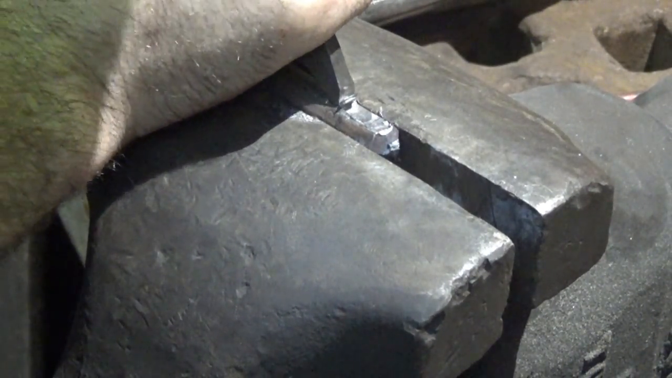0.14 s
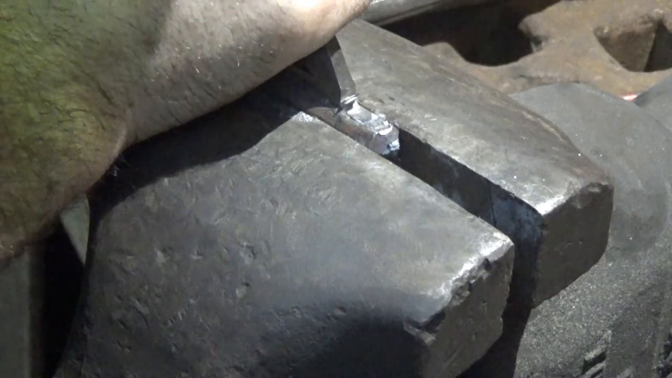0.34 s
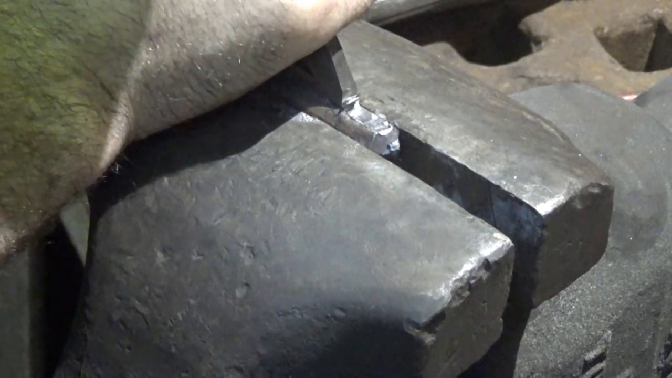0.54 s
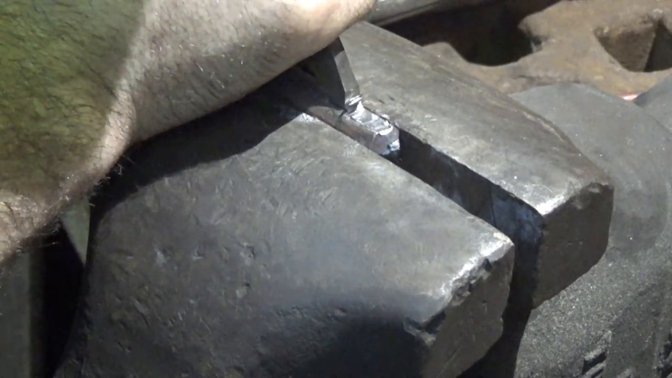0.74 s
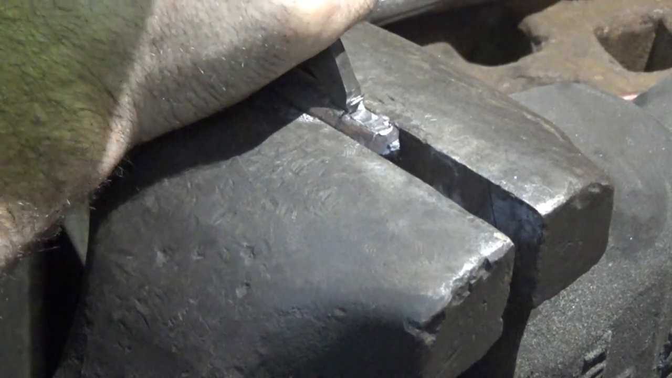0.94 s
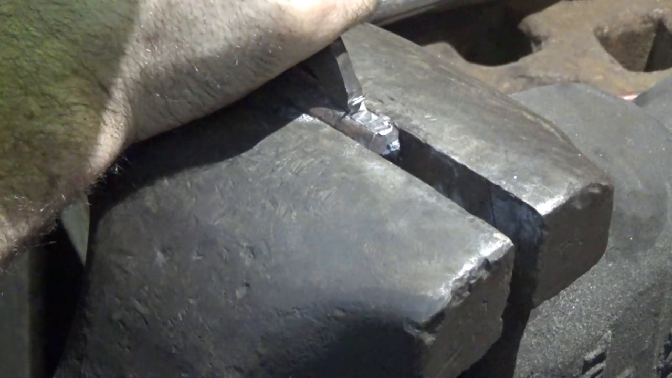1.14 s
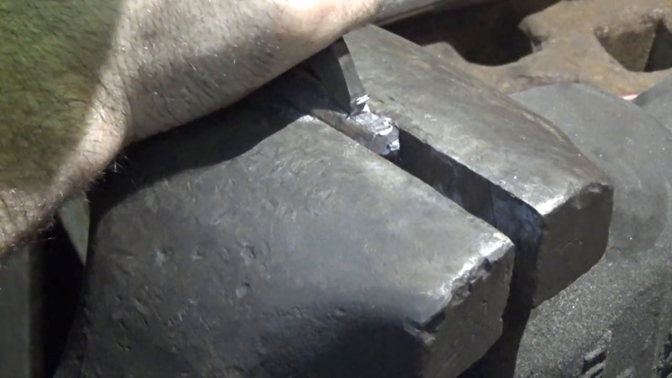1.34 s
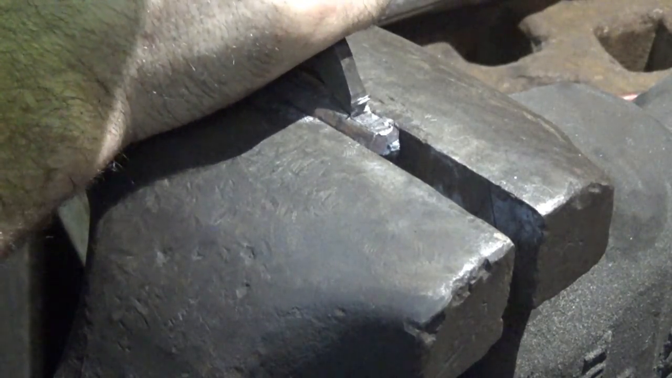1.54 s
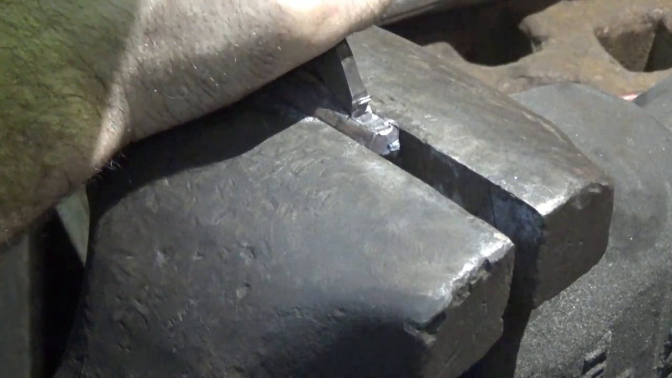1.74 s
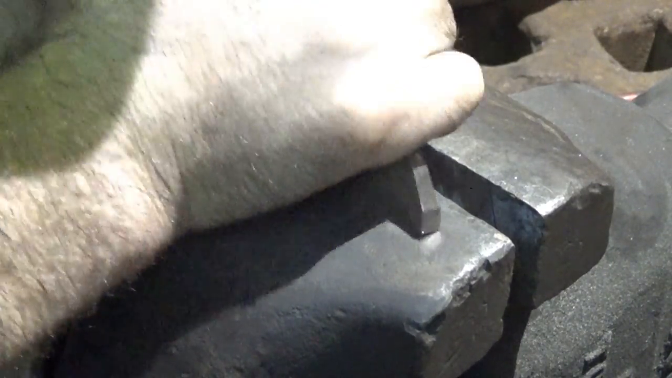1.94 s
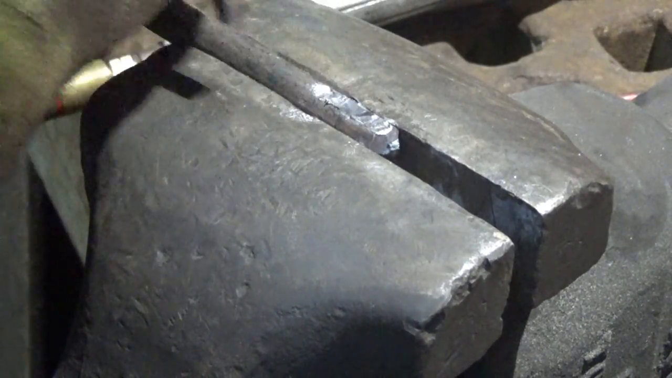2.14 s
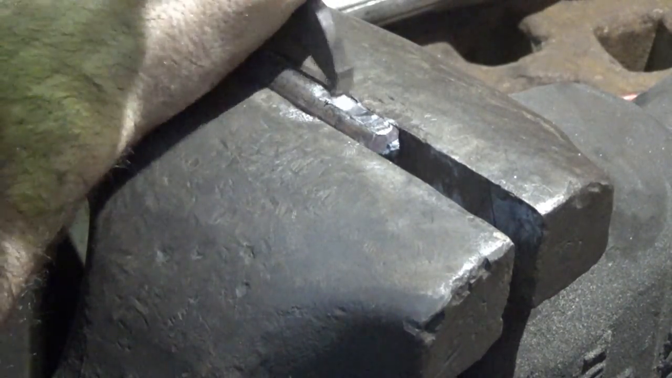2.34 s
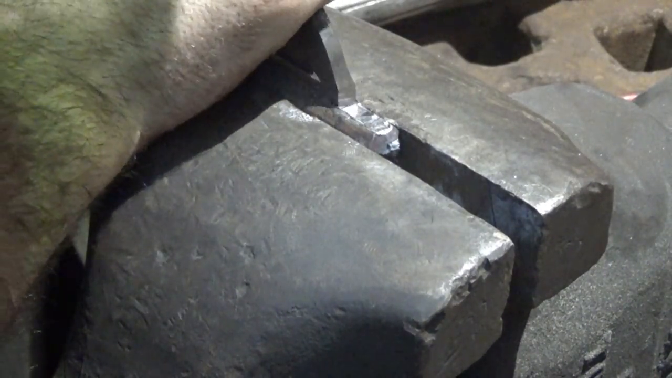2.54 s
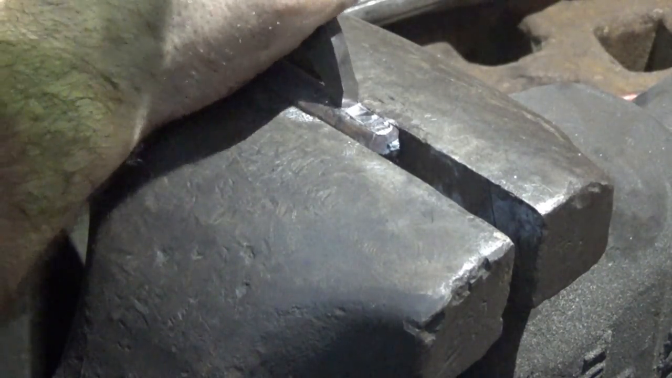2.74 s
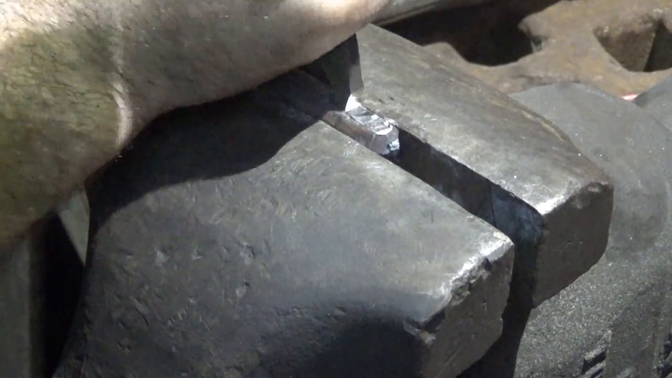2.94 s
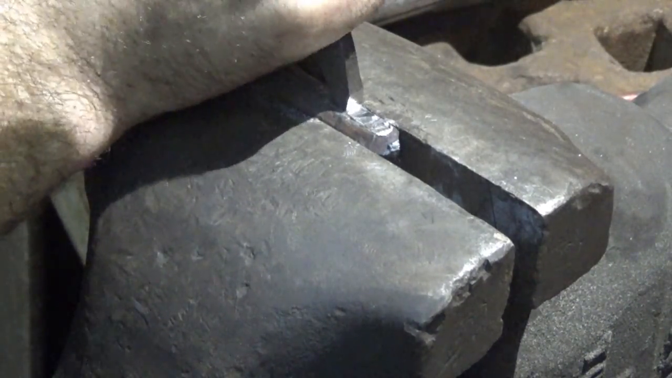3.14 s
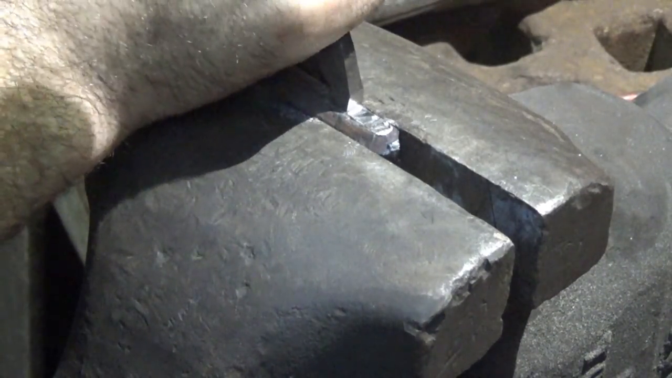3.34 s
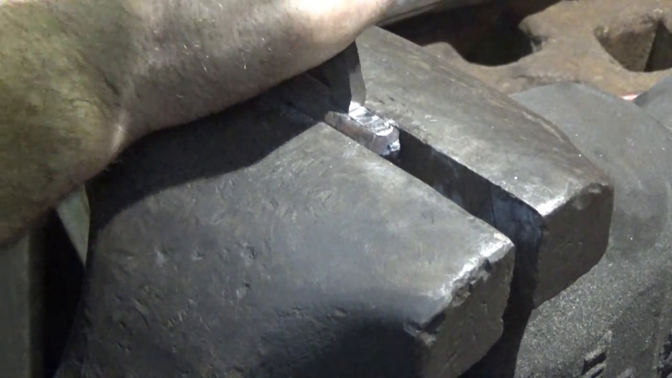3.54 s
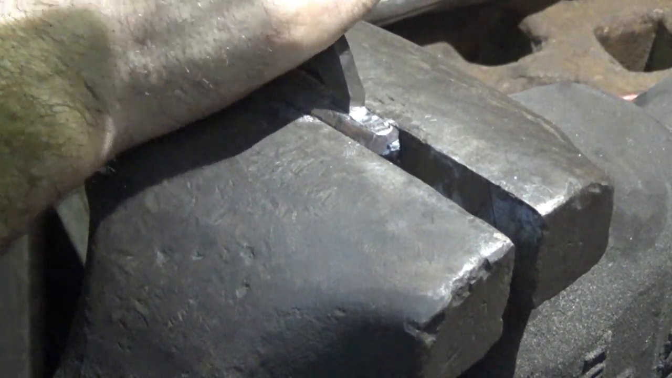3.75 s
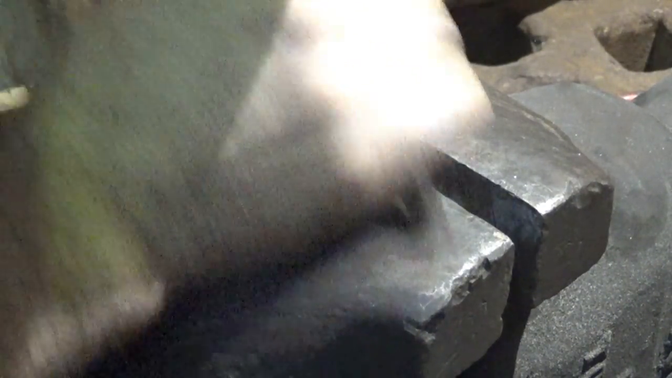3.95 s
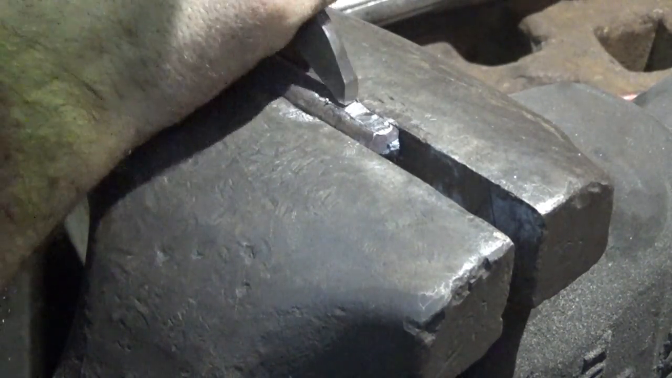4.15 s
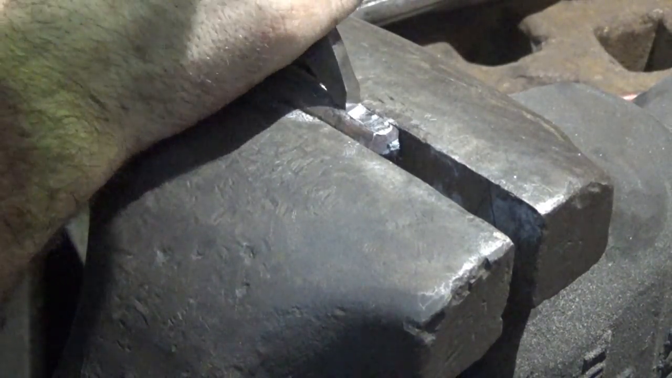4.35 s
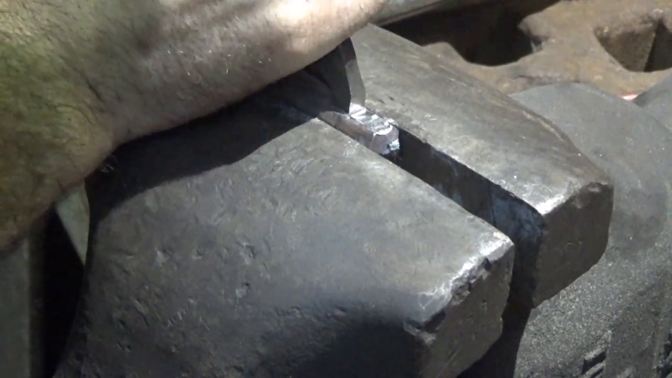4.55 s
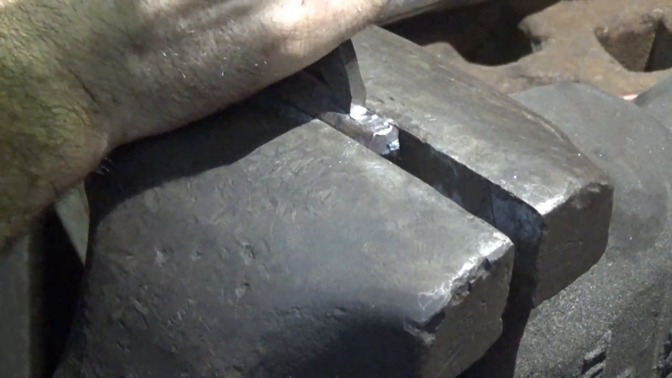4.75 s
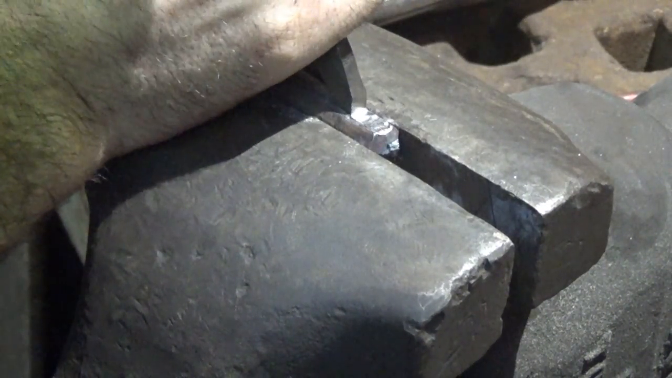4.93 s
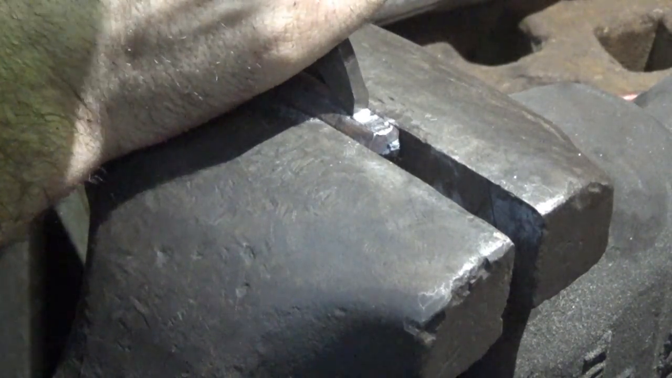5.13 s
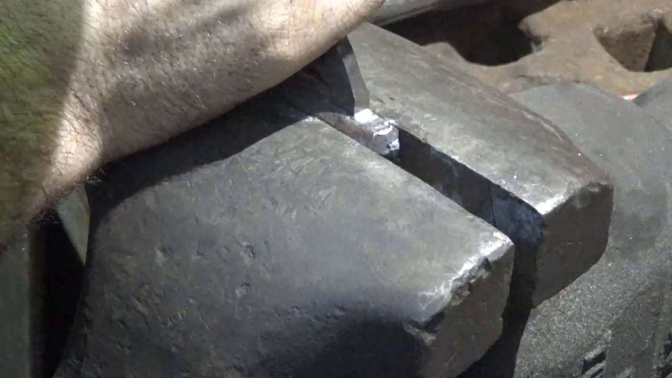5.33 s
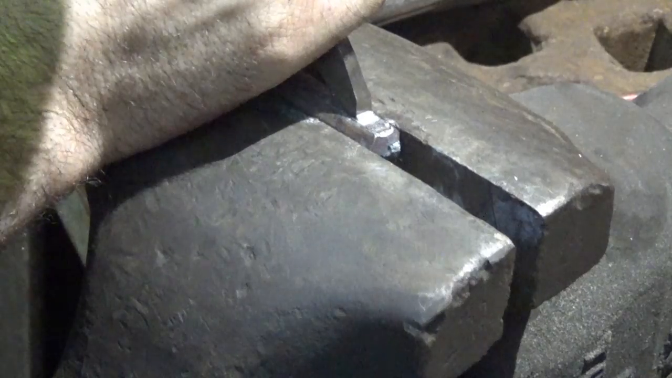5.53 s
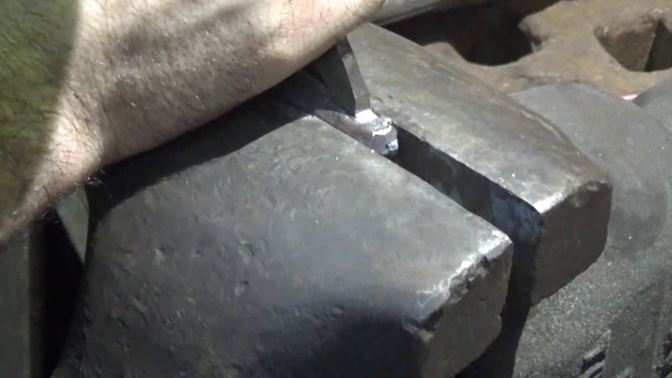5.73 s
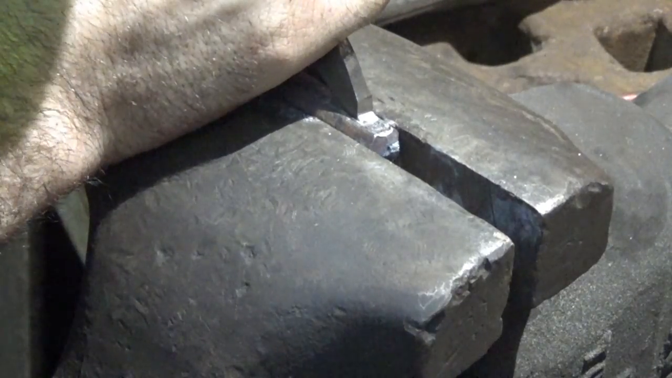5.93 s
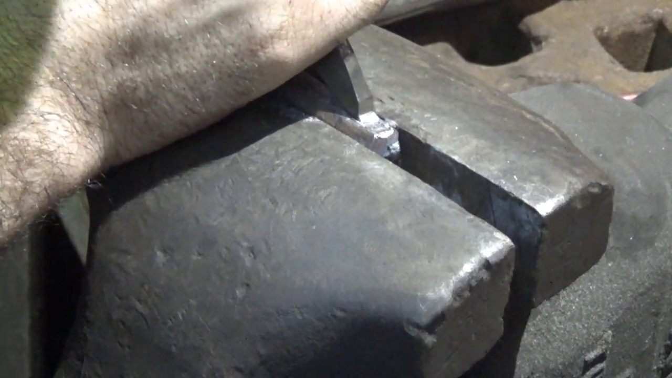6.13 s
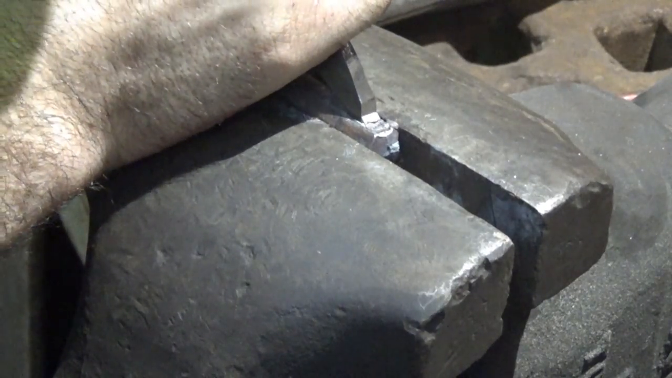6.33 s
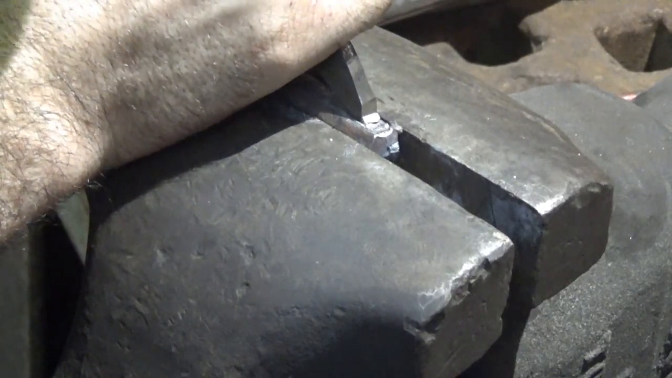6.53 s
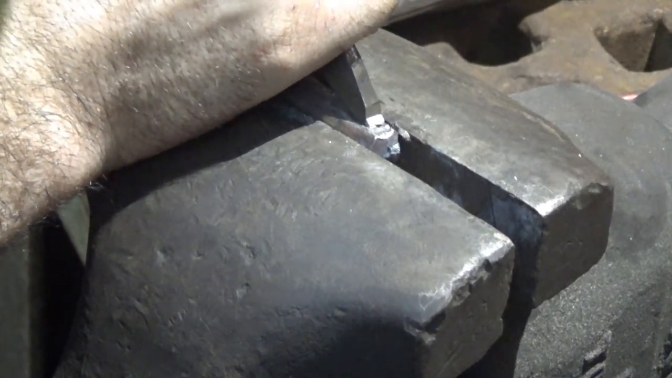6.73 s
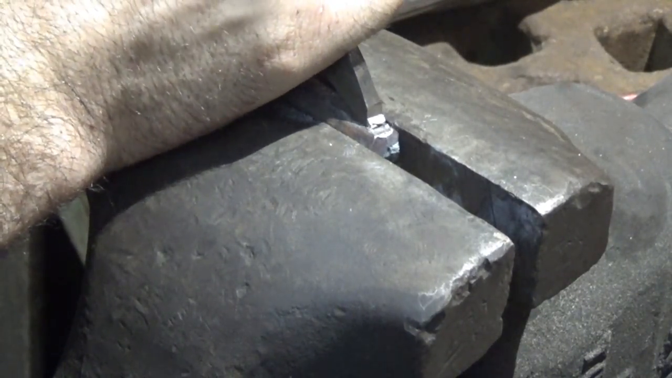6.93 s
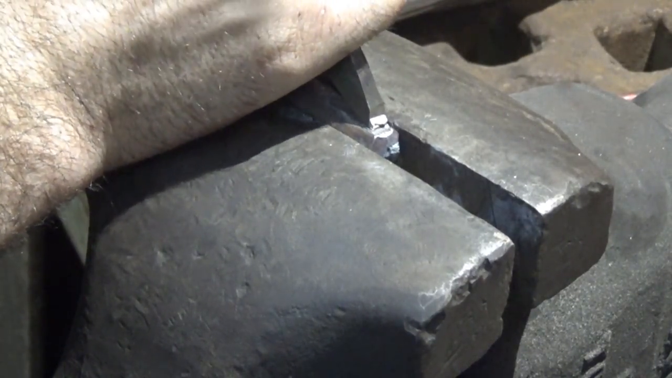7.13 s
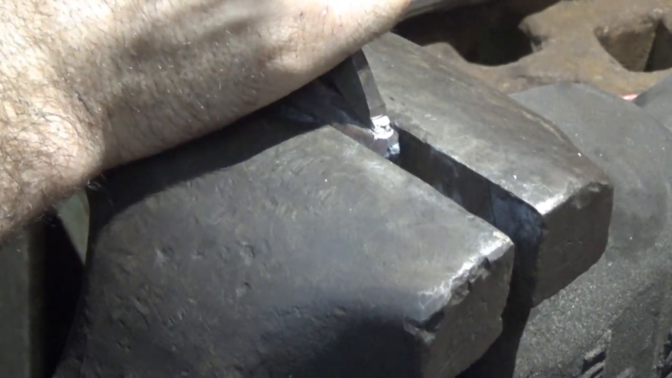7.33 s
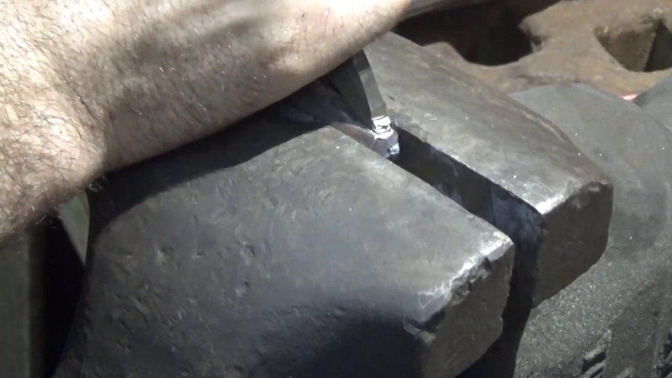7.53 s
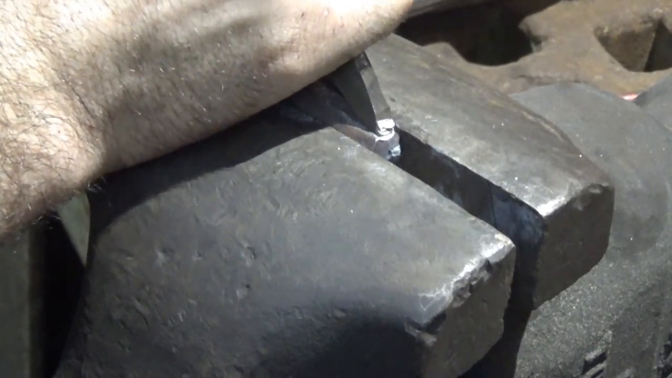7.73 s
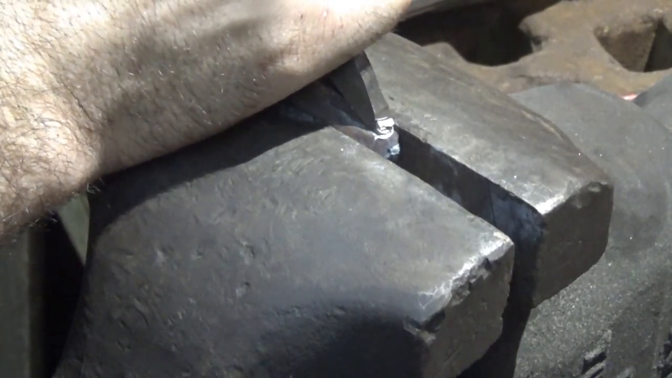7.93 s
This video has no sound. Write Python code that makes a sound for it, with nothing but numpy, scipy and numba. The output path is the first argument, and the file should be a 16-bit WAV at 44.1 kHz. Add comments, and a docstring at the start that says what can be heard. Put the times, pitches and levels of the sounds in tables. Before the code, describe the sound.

Close, loud and slightly flattened clanks of chisel on clamped steel, each with a bright crack, a wavering metallic ring and a short hollow room tail. The slow, slightly uneven hammering breaks off twice. In the gaps the chisel skids with tiny rough squeals and taps on metal, and a clack with a weak knock precedes each restart. Quiet air hiss and workshop hum lie underneath.

```python
"""A slow air hammer drives a chisel into a steel shaft clamped in a vise, about seven blows a second in three bursts.
Each blow is an impact: cracking noise, beating modes of vise and chisel, knocking echoes and a small hard room's tail.
Air hisses from the start over faint room noise and hum. After the first two bursts stick-slip squeals and light
ticks of steel follow; a clack over a weak blow leads into the second and third bursts. A limiter flattens the peaks.
"""
import sys
import numpy as np
from scipy import signal
from scipy.fft import rfft, irfft, next_fast_len
from scipy.io import wavfile
from scipy.ndimage import uniform_filter1d, minimum_filter1d
from numba import njit

SR = 44100
rng = np.random.default_rng(int(sys.argv[2]) if len(sys.argv) > 2 else 0)


def master_out(mix):
    """Clip the mix to full scale and print it as 16-bit PCM to the path in sys.argv[1]."""
    frames = np.transpose(np.atleast_2d(mix))
    ceiling = np.clip(frames, -1, 1)
    pcm = np.round(ceiling * 32767).astype(np.int16)
    wavfile.write(sys.argv[1], SR, pcm)


N = 351918

RING = 16384  # length of one blow's sound [samples]
AGE = np.arange(RING) / SR  # time since the blow [s]
# modes whose strength varies most from blow to blow: vise, then two of the chisel: frequency [Hz]
SWAY_HZ = (1395, 4486, 7943)


def undb(db):
    """Amplitude ratio: 20 dB is a factor of ten."""
    return 10 ** (np.asarray(db) / 20)


def over_hz(size, hz, values):
    """Logarithmic frequency scale: values joined by straight lines on it, at the bins of a transform."""
    bins_hz = np.arange(size // 2 + 1) * SR / size
    return np.interp(np.log(bins_hz + 1), np.log(hz), values)


def colour(x, points):
    """Minimum-phase filter: folding the cepstrum makes a (frequency [Hz], level [dB]) spectrum causal."""
    size = x.shape[-1]
    log_gain = np.log(undb(over_hz(size, *np.transpose(points))))
    cepstrum = irfft(log_gain, size)
    cepstrum[1:size // 2] *= 2
    cepstrum[size // 2 + 1:] = 0
    response = np.exp(rfft(cepstrum))
    return irfft(rfft(x) * response, size)


def fade(t60):
    """Exponential damping: the amplitude falls by 60 dB in t60 [s]."""
    return np.exp(-np.log(1000) * AGE / t60)


def add(out, s, sound):
    """Superposition: mix a sound in at time s [s], cut at both ends of the scene."""
    start = int(s * SR)
    first, last = max(start, 0), min(start + sound.shape[-1], N)
    out[..., first:last] += sound[..., first - start:last - start]


def wander(count, step_s):
    """Low-pass random motion: noise averaged twice over step_s, in rows with an overall spread of 1."""
    size = max(int(step_s * SR), 2)
    rows = rng.standard_normal((count, RING))
    for _ in range(2):
        rows = uniform_filter1d(rows, size, mode="wrap")
    return (rows / rows.std()).astype(np.float32)


def stereo(mid, other):
    """Decorrelated reflections: two close microphones share the mid and hear the side with opposite sign."""
    # side against mid, least in the bass: (frequency [Hz], level [dB])
    apart = [(60, -41), (130, -27), (300, -41), (600, -28), (950, -26), (1400, -18), (3200, -17),
             (5800, -25), (8000, -24), (15000, -25)]
    side = colour(other, apart)
    return np.array([mid + side, mid - side])


def crack(count, t60=0.051):
    """Broadband impact: steel on steel excites a decaying noise, one row for each blow."""
    # spectrum of the direct crack: (frequency [Hz], relative level [dB])
    spectrum = [(100, -28.5), (700, -25), (1500, -20), (2600, 3), (5000, -25.5), (8000, -0.5), (10500, -6),
                (15500, -2)]
    return colour(rng.standard_normal((count, RING)) * fade(t60), spectrum)


def ring(modes, sway_db, scatter_db, beat_s, change, build_s, direct_db, beat_rad=1.0, beat_db=3, direct_t60=0.046):
    """Modal superposition: struck modes beat against their reflections, partly anew on each blow (row)."""
    # damping of the clamped steel: (frequency [Hz], t60 [s])
    damping = [(300, .35), (1400, .29), (2000, .25), (4500, .18), (8000, .15), (12000, .15)]
    count, out = len(sway_db), 0
    beats, change = wander(count, beat_s), float(np.clip(change, 0, 1))

    def beating():
        common = beats[rng.integers(count)]
        fresh = beats[rng.permutation(count)]
        return (1 - change) ** .5 * common + change ** .5 * fresh

    for hz, db in modes:
        # modes within 2.5 % of SWAY_HZ take each blow's own level
        blow_db = sway_db @ (np.abs(hz / np.array(SWAY_HZ) - 1) < .025)
        strength = undb(db + blow_db + scatter_db * rng.standard_normal(count)).astype(np.float32)
        turn, swell = beating(), beating()
        phase = (2 * np.pi * (hz * AGE + rng.random())).astype(np.float32)
        tone = np.sin(phase + float(beat_rad) * turn)
        wave = tone * np.exp(float(np.log(undb(beat_db))) * swell)
        # a quick ring heard directly, then a longer one carried by the room
        direct = undb(direct_db) * fade(direct_t60)
        carried = fade(np.interp(hz, *np.transpose(damping)))
        out = out + strength[:, None] * wave * (direct + carried).astype(np.float32)
    return out * (1 - np.exp(-AGE / build_s))


def workshop(count, build_s=0.0091):
    """Diffuse reverberation: paths stay the same, a share of the field changes with each blow's contact."""
    # dense ring of steel and workshop:
    # (frequency [Hz], relative level [dB], t60 [s], share of power that changes from blow to blow [0 to 1])
    bands = [(40, -36.5, .5, 0.55), (113, -35.5, 0.4, 0.19), (198, -30, 0.46, .1), (320, -23, 0.49, 0.2),
             (583, -20, 0.26, 0.038), (1010, -1.5, 0.2, 0.083), (1510, -1, 0.18, 0.48),
             (3030, -0.5, 0.2, 0.3), (3400, -8, 0.2, 0.29), (6900, -11, 0.17, 0.93),
             (8600, -14, 0.23, 0.85), (10300, -14, 0.18, 0.25), (15500, -7.5, 0.16, 0.43)]
    hz, db, t60, change = np.transpose(bands)
    share = np.clip(over_hz(RING, hz, change), 0, 1)
    paths = rfft(rng.standard_normal(RING))
    contact = rfft(rng.standard_normal((count, RING)))
    field = np.sqrt(1 - share) * paths + np.sqrt(share) * contact
    field = field * undb(over_hz(RING, hz, db))
    # overlapping triangular bands, each with its own decay
    tails = sum(irfft(field * over_hz(RING, hz, band)) * fade(t) for band, t in zip(np.eye(len(hz)), t60))
    return tails * (1 - np.exp(-AGE / build_s))


def returns():
    """Early reflections: bench and corners narrow each echo to a hollow knock."""
    # echoes from bench and walls: (delay [s], frequency [Hz], Gaussian length [s], relative level [dB])
    echoes = [(0.024, 1132, .005, -16), (0.03, 940, .005, -19), (0.04, 1102, 0.0037, -15.5),
              (0.057, 570, .012, -38)]
    out = 0
    for s, hz, length, db in echoes:
        swell = np.exp(-((AGE - s) / length) ** 2)
        out = out + undb(db) * swell * np.sin(2 * np.pi * (hz * AGE + rng.random()))
    return out


def struck(sway_db, crack_db=-4, tail_db=0, vise_db=-2.0, chisel_db=-4):
    """Impact response: crack, ringing steel and room of every blow add up, one row each."""
    # modes of vise, shaft and bench: (frequency [Hz], relative level [dB])
    vise_modes = [(268, -48), (338, -38), (495, -35), (595, -35.5), (734, -32.5), (872, -28.5),
                  (931, -24.5), (1020, -29.5), (1057, -42), (1092, -24), (1149, -52), (1170, -26.5),
                  (1238, -40), (1386, -19.5), (1402, -24), (1671, -30), (1717, -27.5), (1816, -23.5),
                  (1897, -34), (2021, -28.5), (2174, -41), (2293, -29), (2438, -24.5), (2575, -21.5),
                  (2618, -24.5), (2765, -44), (2812, -23.5), (2943, -19), (3003, -33), (3326, -44)]
    # modes of chisel and hammer barrel: (frequency [Hz], relative level [dB])
    chisel_modes = [(3426, -24), (4390, -34.5), (4486, -29), (4790, -28), (5001, -23), (5154, -25.5),
                    (5647, -24.5), (6376, -20.5), (6750, -26.5), (7396, -19.5), (7520, -35.5),
                    (7943, -20.5), (8365, -21.5), (8478, -20), (8548, -29.5), (8669, -19.5), (9299, -26),
                    (9385, -21.5), (11038, -22), (12005, -22.5)]
    count = len(sway_db)
    vise = ring(vise_modes, sway_db, scatter_db=1.97, beat_s=0.027, change=0.08, build_s=0.01, direct_db=7.5)
    chisel = ring(chisel_modes, sway_db, scatter_db=3.5, beat_s=0.01, change=0.19, build_s=0.0034,
                  direct_db=-15)
    steel = undb(vise_db) * vise + undb(chisel_db) * chisel
    return undb(crack_db) * crack(count) + undb(tail_db) * workshop(count) + steel


def hammer(scatter_db=0.5):
    """Force transfer at a contact: piston hits chisel; held loosely, it sounds weak, thin and bright."""
    # blows: (time [s], force [dB], bite: -1 rings the highest mode of SWAY_HZ, +1 the middle one)
    blows = [(-0.068, 0.5, 0.43), (0.0796, 1, 0.075), (0.2288, 0, -0.47), (0.3747, 1, -0.97),
             (0.5242, 1, 0.19), (0.6785, -0.5, -0.85), (0.8299, 0, 0.62), (0.9766, 0.5, -0.12),
             (1.1267, -0.5, 0.0046), (1.2725, -1, 0.23), (1.435, -2, 0.88), (1.5728, 0, -0.15),
             (1.7123, -2.5, 0.22), (1.847, -12, -1.56), (3.1057, -5, .2), (3.2427, 0, 0.49),
             (3.3666, 0, -0.21), (3.495, -1.5, 0.72), (3.6572, 0.5, -0.29), (3.8053, -18, -0.3),
             (4.6612, 0.5, .3), (4.8073, 1, 0.71), (4.9461, 0.5, -0.2), (5.0783, 2.5, 0.39),
             (5.2115, -0.5, -0.086), (5.3474, 1.5, 0.17), (5.491, 2, 0.51), (5.6433, 3, 1),
             (5.802, -0.5, -1.1), (5.9508, 0, -0.93), (6.0977, -0.5, -1), (6.255, 0.5, 0.24),
             (6.401, 0.5, 0.17), (6.5456, 0, -0.86), (6.6981, 1, .5), (6.8474, 0.5, -0.33),
             (7.0008, 0.5, -.1), (7.1521, 1.5, -0.015), (7.2971, 1.5, 0.43), (7.4363, -1, 0.14),
             (7.5687, -4, 0.12), (7.7016, -2, 0.22), (7.829, -3, -.3), (7.947, -2.5, 0.032)]
    # a loose chisel passes less force to the shaft but chatters as brightly as ever:
    # (frequency [Hz], level at full force [dB], gain per force lost [dB/dB])
    contact_colour = [(2510, -1, 0), (4500, 1.34, 0.48), (8650, -0.2, .5), (12000, -0.5, 1.16)]
    # ring of the vise near 1.4 kHz as the cut advances: (time [s], relative level [dB])
    vise_ring = [(0, 2), (1.7, 3.5), (3.65, 4.5), (4.8, -2.5), (5.3, -1.5), (5.7, -15), (5.95, 1),
                 (6.35, -4.5), (7.05, 3.5), (7.95, 0.5)]
    vise_coupling = 0.45  # a weak blow rings those modes even less than it knocks [dB/dB]
    # the two chisel modes that trade with the bite: level at bite 0 [dB], change per unit of bite [dB]
    middle_db, middle_bite_db = 1, 15.5
    highest_db, highest_bite_db = 4, -8

    times, forces, bite = np.transpose(blows)
    vise_sway = np.interp(times, *np.transpose(vise_ring)) + vise_coupling * forces
    middle_sway = middle_db + middle_bite_db * bite
    highest_sway = highest_db + highest_bite_db * bite
    sway_db = np.transpose([vise_sway, middle_sway, highest_sway])
    sway_db = sway_db + scatter_db * rng.standard_normal(sway_db.shape)
    sounds = stereo(struck(sway_db) + returns(), struck(sway_db))
    out = np.zeros((2, N))
    for k, (s, force_db) in enumerate(zip(times, forces)):
        contact = [(hz, db - loose * force_db) for hz, db, loose in contact_colour]
        add(out, s, undb(force_db) * colour(sounds[:, k], contact))
    return out


def air(spectrum, spread_db):
    """Stationary noise: the nearer its source, the more alike the two channels."""
    near, other = colour(rng.standard_normal((2, next_fast_len(N))), spectrum)
    return stereo(near, undb(spread_db) * other)[:, :N]


def leak(t):
    """Turbulent jet noise: air hisses as the trigger opens the valve and dies away when it shuts."""
    # spectrum of the escaping air: (frequency [Hz], relative level [dB])
    spectrum = [(300, 5.3), (1500, 8.1), (3000, 1.5), (5300, 8.7), (8000, 1.9), (9800, 4.5), (12000, 0.39),
                (16000, 3.5)]
    # while the trigger is half pressed: (from [s], until [s], relative level [dB])
    openings = [(0, 2.59, -65), (3.0, 4.35, -62)]
    attack_s, t60_s, shut_db = 0.22, 0.11, -83.5
    flow = undb(shut_db)  # a trace of air always escapes
    for start, end, db in openings:
        opening = np.clip((t - start) / attack_s, 0, 1)
        closing = np.exp(-np.log(1000) * np.maximum(t - end, 0) / t60_s)
        flow = flow + undb(db) * opening * closing
    return air(spectrum, spread_db=-5.5) * flow


def room():
    """Diffuse background: coloured noise, nearly alike in both channels, a little wider than the air's hiss."""
    # spectrum of the room: (frequency [Hz], level [dB])
    spectrum = [(25, -67.5), (60, -71), (100, -47.5), (135, -60.5), (172, -51.5), (245, -63), (350, -49.5),
                (520, -58.5), (700, -58), (950, -54.5), (1700, -53.5), (3000, -57.5), (8000, -65),
                (16000, -71)]
    return air(spectrum, spread_db=2.5)


def hum(t):
    """Steady tonal radiation: faint sines of workshop machinery, alike in both channels."""
    # machine tones: (frequency [Hz], level [dB])
    tones = [(104, -92), (328, -77), (511, -72), (619, -76.5), (1685, -71)]
    return sum(undb(db) * np.sin(2 * np.pi * hz * t) for hz, db in tones)


def skids(rough_rad=1.66, rough_s=0.0012, third_db=-6):
    """Stick-slip friction: the sliding edge squeals in a rough gliding tone and its third harmonic."""
    # the edge slides off the shaft: (time [s], length [s], start [Hz], end [Hz], relative level [dB])
    slides = [(1.925, 0.04, 4000, 2610, -41.5), (2.21, 0.035, 3100, 2870, -43.5),
              (2.236, 0.054, 3050, 2760, -46.5), (3.813, 0.08, 4050, 4140, -29.5),
              (3.89, 0.04, 3700, 2640, -35)]
    out = np.zeros((2, N))
    for s, length, start_hz, end_hz, db in slides:
        progress = np.clip(AGE / length, 0, 1)
        glide_hz = start_hz + (end_hz - start_hz) * progress
        phase = 2 * np.pi * np.cumsum(glide_hz) / SR + rough_rad * wander(2, rough_s)
        tone = np.sin(phase) + undb(third_db) * np.sin(3 * phase)
        swell = np.sin(np.pi * progress)
        add(out, s, undb(db) * stereo(*(tone * swell)))
    return out


def tick(t60, room_db, room_t60=0.19):
    """Light impact: a short bright noise of steel with a faint room tail."""
    # colour of a light touch: (frequency [Hz], relative level [dB])
    touch_colour = [(200, -18), (1800, -2), (2900, 14.5), (5500, 4), (8000, 12), (10000, 9), (12500, 7.5),
                    (16000, 2)]
    # contact of a light tap: (frequency [Hz], relative level [dB])
    tap_contact = [(2200, -1), (2900, -7.5), (3800, -5), (9000, 4.5)]
    direct, tail = rng.standard_normal((2, 2, RING))
    sound = stereo(*(direct * fade(t60) + undb(room_db) * tail * fade(room_t60)))
    return colour(colour(sound, touch_colour), tap_contact)


def touches(room_db=-17):
    """Rebound and contact damping: light taps of steel on steel after the first two bursts."""
    # the piston rebounds; the chisel slips off and is set down again:
    # (time [s], relative level [dB], contact t60 [s])
    taps = [(1.934, -44, 0.13), (2.214, -50, .06), (2.231, -52, .03), (2.258, -38, 0.024),
            (2.297, -49, .024), (2.301, -46, .029), (2.496, -48.5, 0.072), (2.856, -58, 0.014),
            (2.9742, -31, 0.0081), (3.851, -31, 0.047), (3.899, -29.5, 0.032), (3.903, -33, 0.036),
            (4.093, -55.5, .06), (4.201, -51, .04), (4.206, -37, 0.019)]
    out = np.zeros((2, N))
    for s, db, t60 in taps:
        add(out, s, undb(db) * tick(t60, room_db))
    return out


def half_strokes(clack_room_db=-24):
    """Partial momentum transfer: the piston clacks and barely nudges the chisel."""
    # ahead of the second and third bursts: (time [s], force [dB], relative clack level [dB])
    strokes = [(2.9493, -24, -16.5), (4.514, -15.5, -26)]
    clack_t60 = 0.015  # [s]
    sway_db = np.zeros((len(strokes), len(SWAY_HZ)))
    sounds = stereo(struck(sway_db) + returns(), struck(sway_db))
    out = np.zeros((2, N))
    for k, (s, force_db, clack_db) in enumerate(strokes):
        clack = undb(clack_db) * tick(clack_t60, clack_room_db)
        add(out, s, undb(force_db) * sounds[:, k] + clack)
    return out


def scene():
    """Linear superposition: hammer, leaking air, room, hum, squeals, taps and half strokes."""
    t = np.arange(N) / SR
    steady = leak(t) + room() + hum(t)
    return hammer() + steady + skids() + touches() + half_strokes()


@njit
def follow(x, attack, release):
    """Asymmetric one-pole smoothing: the envelope rises fast and sinks slowly."""
    out, e = np.empty(len(x)), 0.
    for i in range(len(x)):
        e += (x[i] - e) * (attack if x[i] > e else release)
        out[i] = e
    return out


def limiter(x, ceiling_db=-8.5, attack_s=0.0001, release_s=0.011, knee=5, size=66):
    """Gain control with a soft knee: the gain holds the envelope down and eases in just ahead of each peak."""
    attack, release = 1 - np.exp(-1 / (attack_s * SR)), 1 - np.exp(-1 / (release_s * SR))
    envelope = follow(np.abs(x).max(axis=0), attack, release)
    gain = (1 + (envelope / undb(ceiling_db)) ** knee) ** (-1 / knee)
    # windows in samples, centred so that the gain looks ahead
    return x * uniform_filter1d(minimum_filter1d(gain, 2 * size), size)


def record(dry):
    """Band limitation: the microphones' limiter tames the blows, then filters cut rumble and the very top."""
    top_hz = 15800
    rumble_cut = signal.butter(2, 48, "high", fs=SR, output="sos")
    top_cut = signal.ellip(10, .2, 80, top_hz, fs=SR, output="sos")
    limited = limiter(dry)
    return signal.sosfilt(top_cut, signal.sosfilt(rumble_cut, limited))


dry = scene()
out = record(dry)
master_out(out)
```